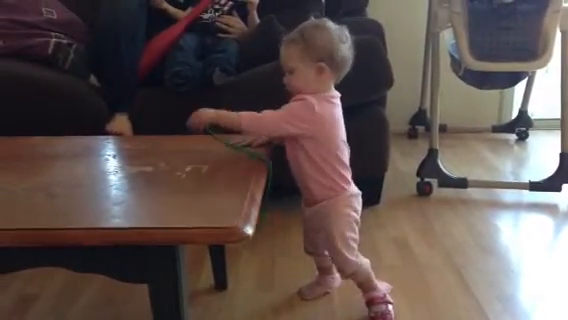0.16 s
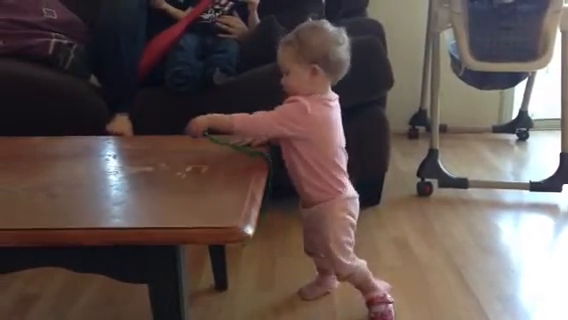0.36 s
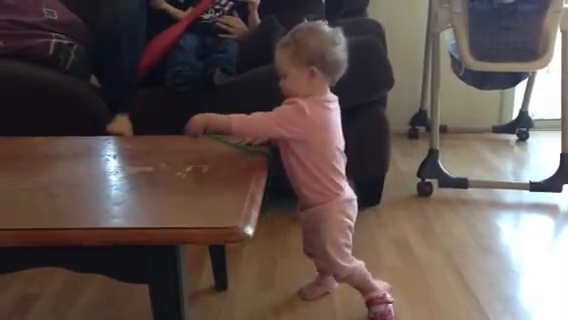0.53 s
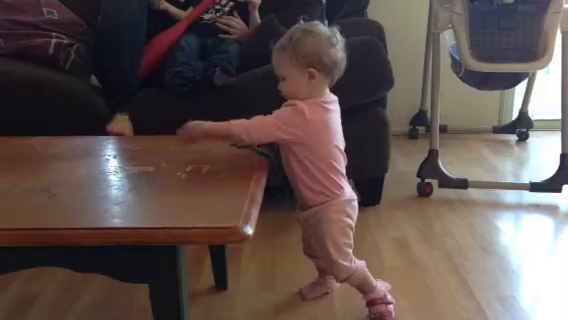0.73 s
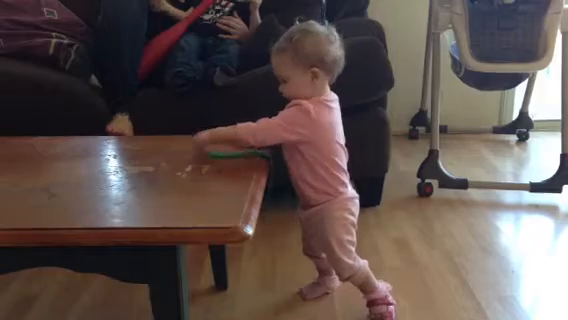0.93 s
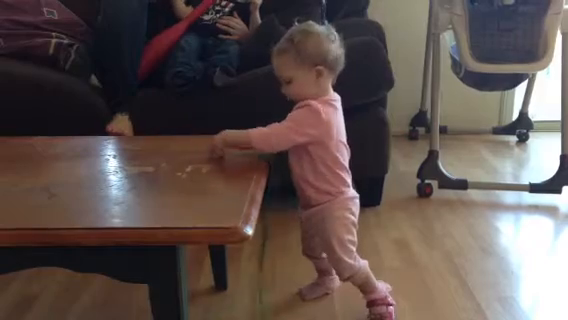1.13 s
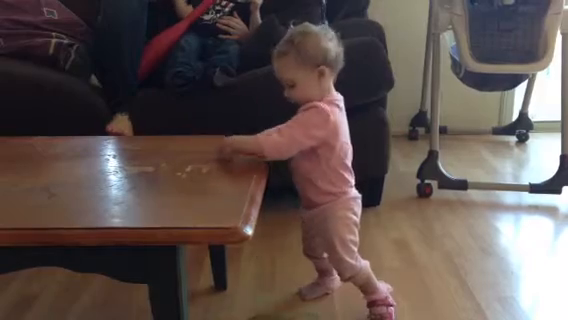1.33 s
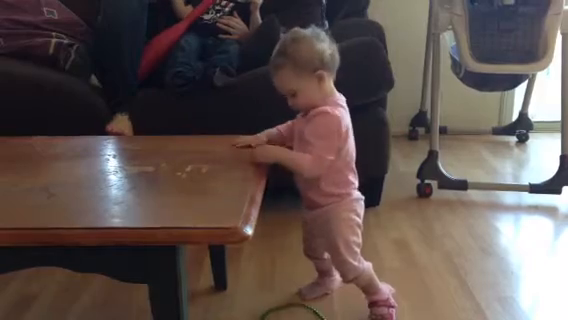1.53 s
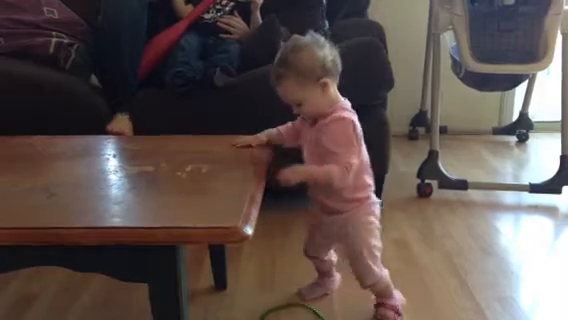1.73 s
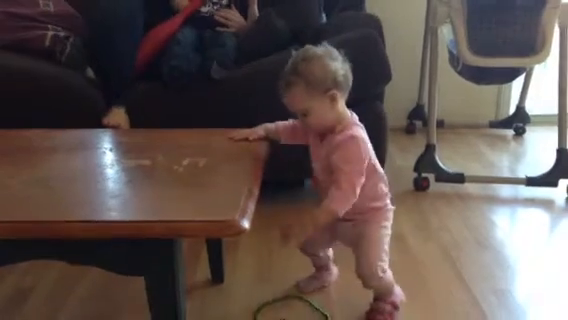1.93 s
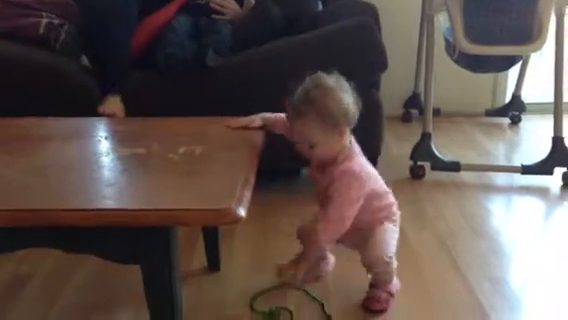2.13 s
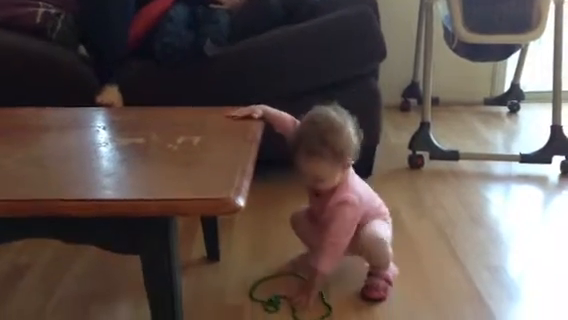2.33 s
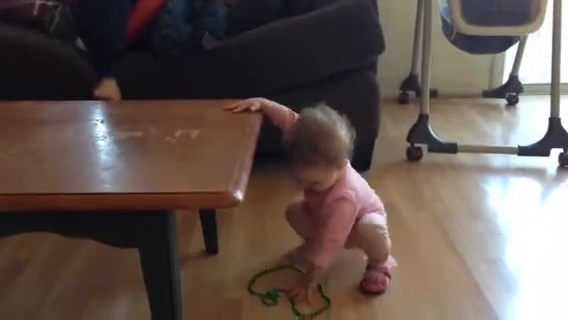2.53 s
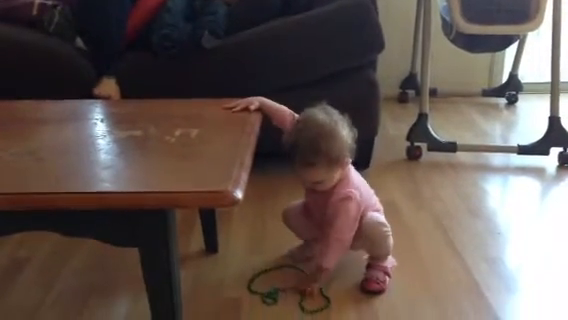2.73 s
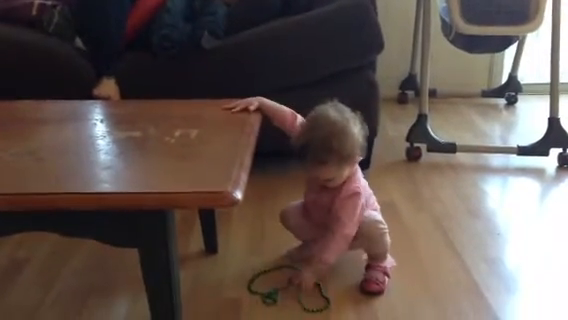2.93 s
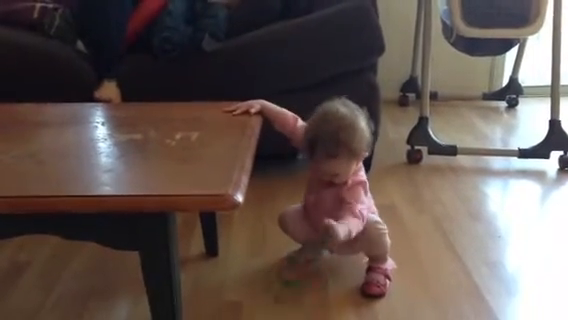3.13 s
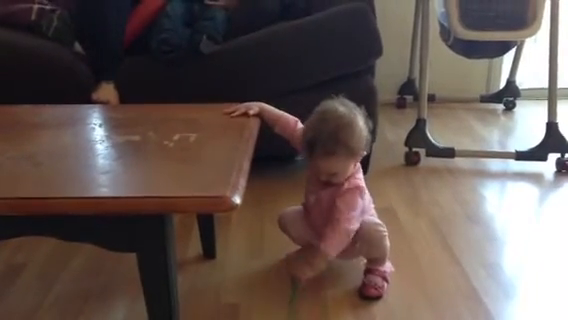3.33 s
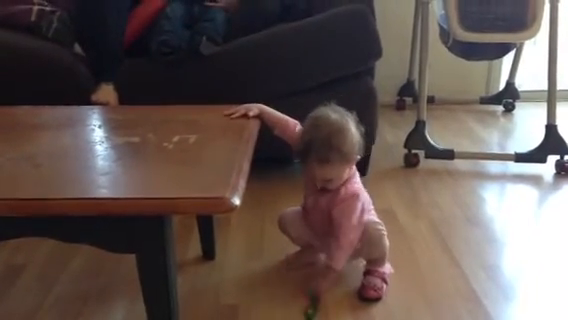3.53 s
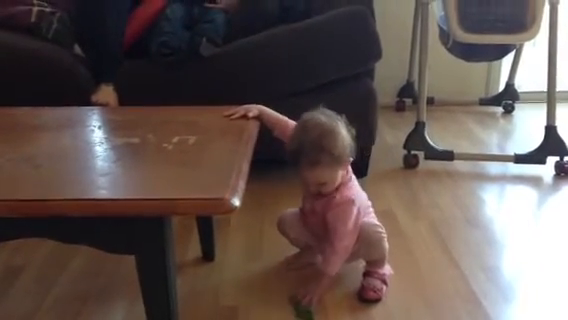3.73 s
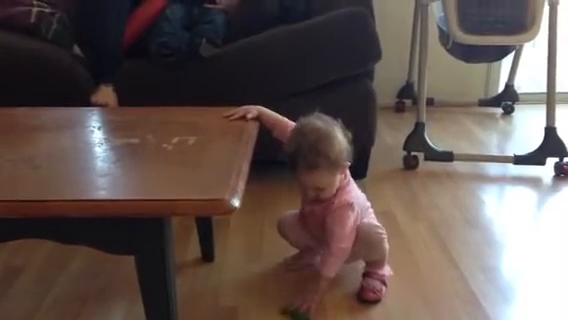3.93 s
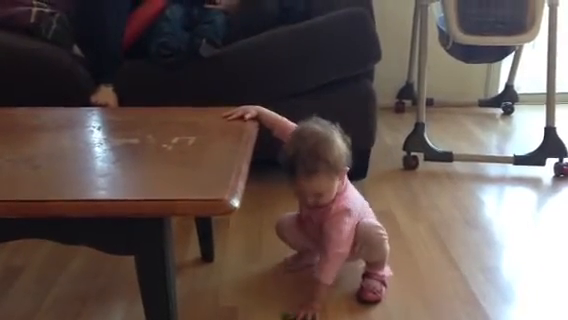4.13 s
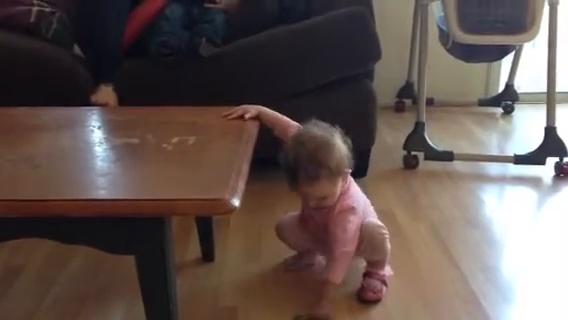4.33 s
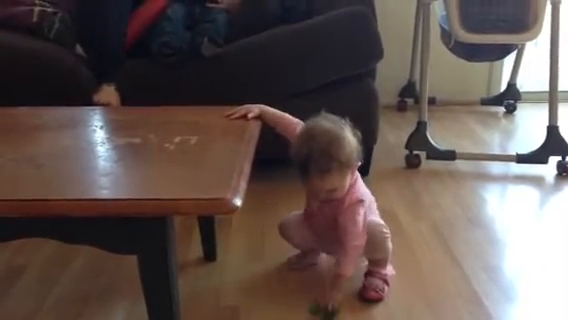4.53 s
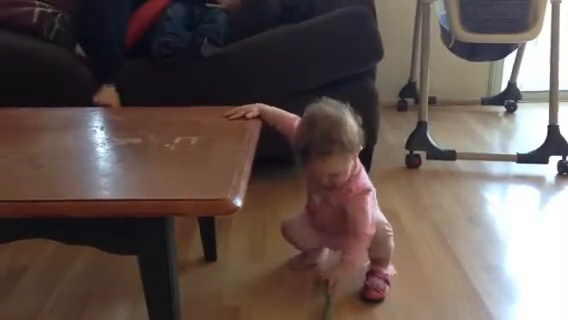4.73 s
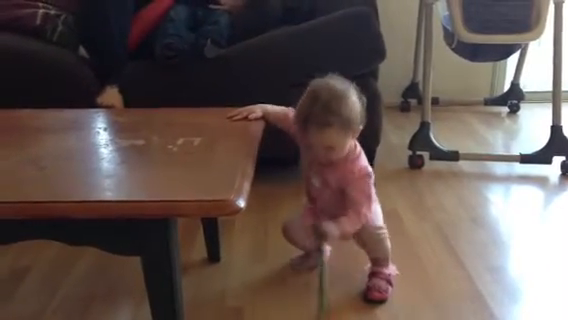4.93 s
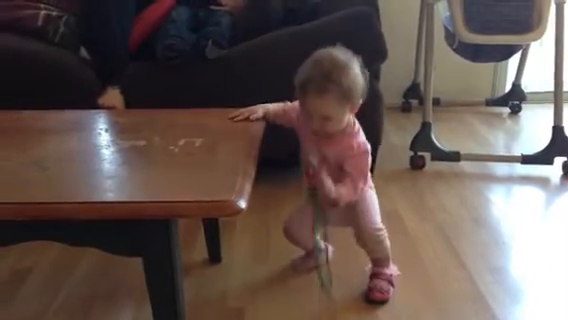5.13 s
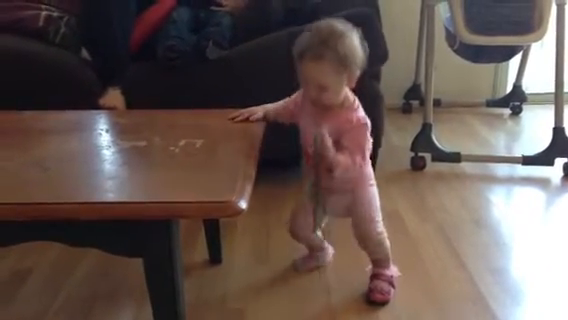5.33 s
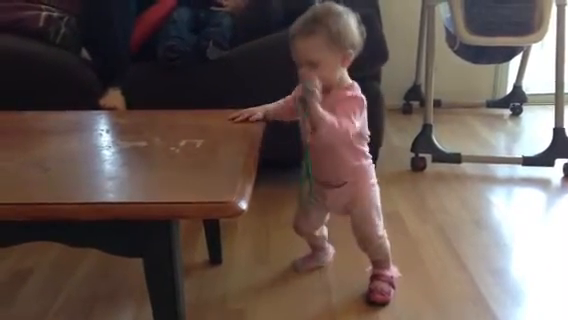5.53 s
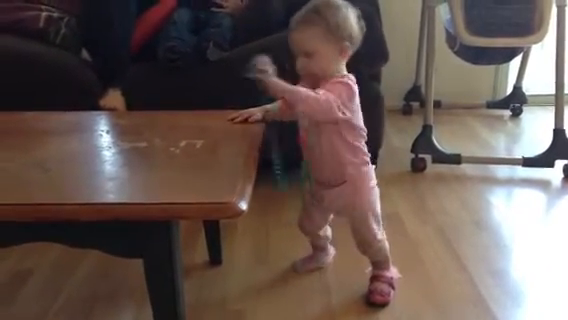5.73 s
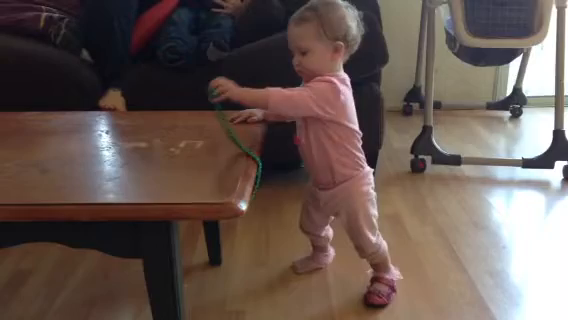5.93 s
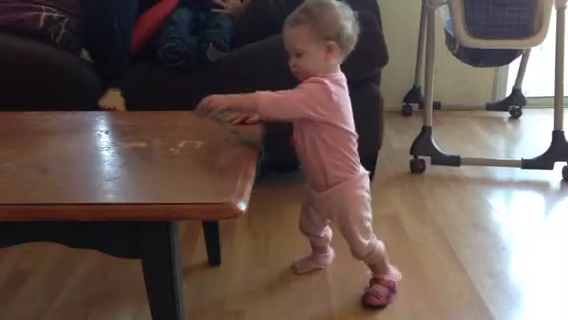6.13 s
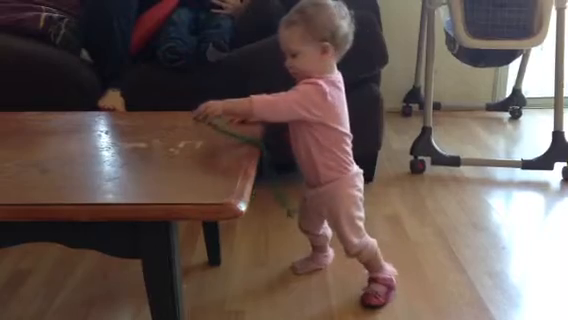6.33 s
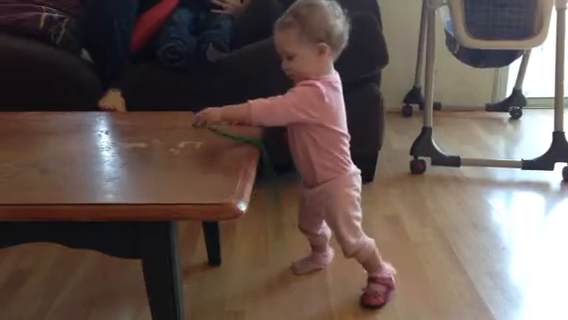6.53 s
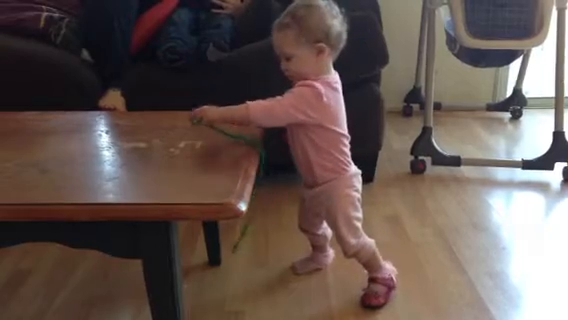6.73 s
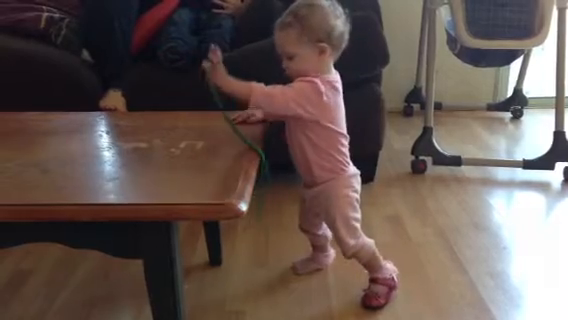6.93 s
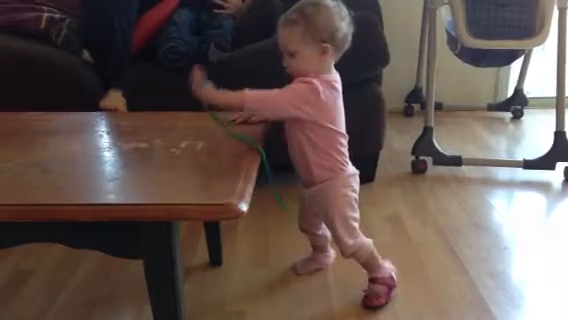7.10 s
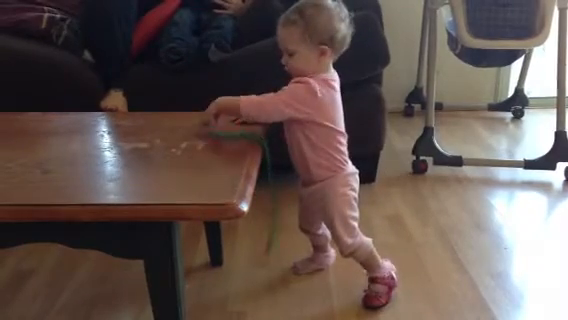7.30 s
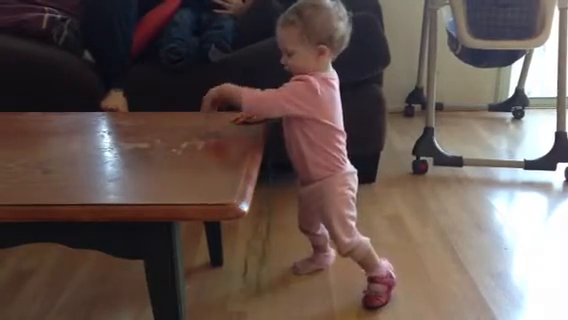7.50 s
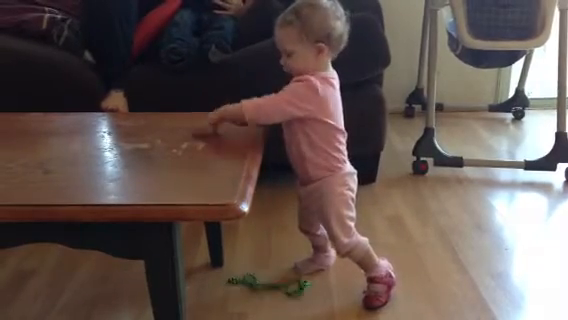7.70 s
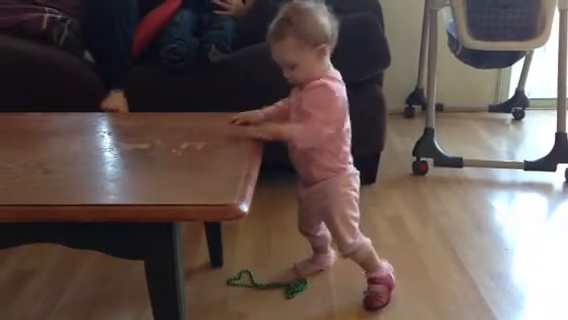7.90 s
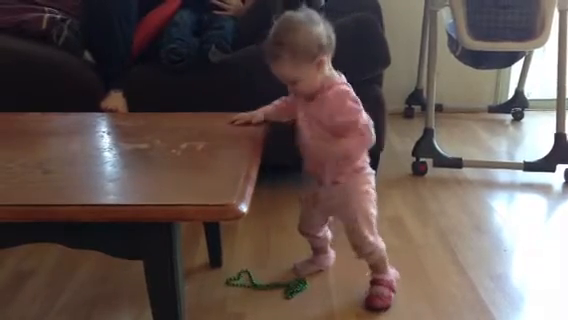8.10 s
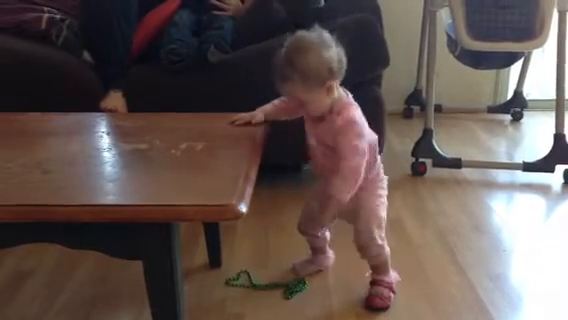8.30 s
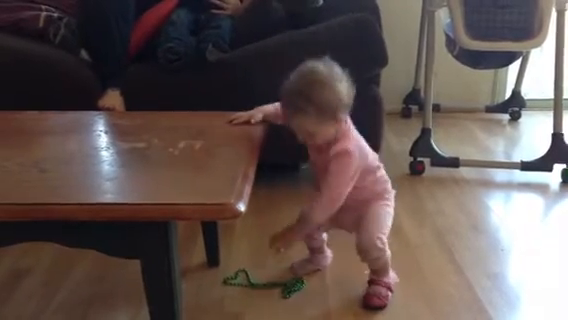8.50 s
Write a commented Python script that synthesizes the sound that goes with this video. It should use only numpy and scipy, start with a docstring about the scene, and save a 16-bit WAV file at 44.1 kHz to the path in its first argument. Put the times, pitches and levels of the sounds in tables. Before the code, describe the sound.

A string of light plastic beads drags softly over a wooden table, then slides off and hits a hardwood floor in a quick bright clatter. Fingers stir it with small ticks, a smaller drop follows, then a quiet pause. The beads slap back on the table, drag, and fall loudly again. Fairly close small microphone, living room with short reflections, faint ventilation and hum.

```python
"""Plastic beads on a string clatter on a hardwood floor: each contact excites a short minimum-phase pulse.
A toddler drags the necklace over a wooden table until it slides off; she gathers it, drops it,
lifts it back onto the table, and it slides off again. Decaying modes carry the sound of the table top.
Reflections and a diffuse tail of under half a second follow each click.
Filtered noise and three wavering sines form the ventilation and the appliance hum behind it all."""
import sys
import numpy as np
from scipy import signal
from scipy.fft import rfft, irfft, next_fast_len
from scipy.io import wavfile
from scipy.ndimage import uniform_filter1d

SR = 44100
rng = np.random.default_rng(int(sys.argv[2]) if len(sys.argv) > 2 else 0)


def unload_audio(sound):
    """Save the sound as a 16-bit wav file, at the path given as the first command line argument."""
    columns = np.transpose(np.atleast_2d(sound))
    # keep every value between -1 and 1, then stretch to whole-number steps
    steps = np.round(np.clip(columns, -1, 1) * 32767)
    wavfile.write(sys.argv[1], SR, steps.astype(np.int16))


N = 377348

# Single beads that click out clearly, on the floor or against each other.
# Each row: start in seconds, peak level in dB before gain, share of bead on bead in dB.
SINGLE_BEADS = [(1.4478, -13.5, -9), (1.4709, -14, -9), (1.5867, -25.5, -9), (1.5942, -25.5, -14),
                (2.817, -36, -7), (2.8972, -38.5, -9), (2.9859, -38, -9), (3.0105, -21.5, -3.5),
                (3.0461, -23, -3), (3.0826, -24, 2), (3.0935, -19.5, -2), (3.1235, -20.5, -12),
                (3.1363, -21, -12), (3.1848, -26.5, -1), (3.2108, -25.5, -9), (3.3217, -17.5, -13),
                (3.3535, -13, 4), (3.3803, -9, 1), (3.4953, -12.5, -6), (3.6655, -20, -6),
                (3.7266, -23.5, -19), (3.7745, -30, -3), (3.82, -18.5, -5.5), (3.8293, -28, -11),
                (3.8735, -27, -3), (3.9536, -34, 0), (4.3459, -25.5, -1), (4.4583, -31, -1),
                (4.5372, -26.5, -5), (4.6105, -29, 1), (4.7858, -34.5, -1), (4.8247, -35, -3),
                (4.9245, -32.5, 2), (5.0687, -25.5, -6), (5.1654, -32.5, 0), (6.962, -38.5, 11),
                (7.795, -14.5, -8)]
# Strokes of the fingers stirring the beads on the floor.
# Each row: start in seconds, length in seconds, level in dB before gain, change over the stroke in dB.
FINGER_STIRS = [(2.412, .07, -57, -11.5), (2.65, 0.28, -61.5, -2), (3.01, 0.07, -53, 1),
                (3.07, 0.1195, -44.5, -4.5), (3.43, 0.38, -34.5, -23.5), (3.83, 0.32, -53.5, -15),
                (4.178, .15, -54.5, -3.5), (4.33, 0.062, -51, 6.5), (4.39, 0.27, -45, -12),
                (4.66, 0.14, -64, -4), (4.782, 0.29, -57.5, 1), (5.068, 0.096, -51.5, -8)]


def floor(stir_gain_db=-2, stir_clink_db=-10):
    """Superposition: strikes, dense small contacts, board knocks and clinks add up on the floor."""
    falls = [pouring(fall) for fall in NECKLACE_FALLS]
    stirring = strokes(FINGER_STIRS, attack_s=0.0042, release_s=0.006)
    pour = sum(falls) * contacts(per_s=600, spread_db=4.0)
    stir = amp(stir_gain_db) * stirring * contacts(per_s=260, spread_db=1.5)
    knocks = floorboards(pour, stir)
    # the more tangled the string, the more its beads hit each other
    tangle = sum(amp(fall[-1]) * gain for fall, gain in zip(NECKLACE_FALLS, falls))
    tangle = tangle + amp(stir_clink_db) * stirring
    clinks = ring(tangle * contacts(per_s=680, spread_db=6.0), click(CLINK_COLOUR))
    strikes = ticks(SINGLE_BEADS + landings())
    poured = beads(pour, pitch_spread=0.22)
    stirred = beads(stir, pitch_spread=0.21, shift=0.96)
    return strikes + poured + stirred + knocks + clinks


# The necklace falls: its end touches down, a run of beads follows, the rest lands in a heap,
# bounces and settles. Each row: touch in seconds, heap in seconds, heap length in seconds,
# run peak level, heap peak level and settling level in dB before gain, settling length in seconds,
# share of bead on bead in dB.
NECKLACE_FALLS = [(1.2463, 1.3466, 0.032, -13.5, -1.5, -38, 0.17, -6.5),
                  (3.317, 3.402, 0.019, -23.5, -9, -36.5, 0.1, -0.5),
                  (7.6, 7.6975, 0.022, -9, -1, -42, 0.14, -9)]


def landings(run_gap_s=.0068, heap_gap_s=.0042, lead_db=10.5, lead_s=0.011, growth_db=7.5, fade_db=-12):
    """Sequential impact: the leading end hits hard, the run grows as the string speeds up, the heap fades."""
    rows = []
    for touch, heap, heap_length, run_db, heap_db, _, _, tangle_db in NECKLACE_FALLS:
        run_length = heap - touch
        for t, scatter in succession(run_length, run_gap_s):
            lead = lead_db * np.exp(-(t / lead_s) ** 2)
            growth = growth_db * (t / run_length - 1)
            rows.append((touch + t, run_db + lead + growth + scatter, tangle_db))
        for t, scatter in succession(heap_length, heap_gap_s):
            fade = fade_db * t / heap_length
            rows.append((heap + t, heap_db + fade + scatter, tangle_db))
    return rows


def succession(length, gap_s, uneven=.6, scatter_db=2.2, count=32):
    """Quasi-periodicity: beads on a string land almost evenly; gives delays (s) and force scatter (dB)."""
    slip = rng.uniform(-.5, .5, count)  # in shares of a gap, before uneven
    scatter = rng.standard_normal(count)
    delay = gap_s * (np.arange(count) + uneven * slip)
    delay[0] = scatter[0] = 0
    return zip(delay[delay < length], scatter_db * scatter)


def pouring(fall, run_share_db=-24, heap_share_db=-23, swell_db=4, bounce_s=0.092, settle_fade_db=-16.5):
    """Envelope shaping of the small contacts in a fall: run, heap, then settling after one bounce."""
    touch, heap, heap_length, run_db, heap_db, settle_db, settle_length, _ = fall
    stages = [(touch, heap - touch, run_db + run_share_db, swell_db),
              (heap, heap_length, heap_db + heap_share_db, 0),
              (heap + bounce_s, settle_length, settle_db, settle_fade_db)]
    return strokes(stages, attack_s=0.0027, release_s=0.0065)


# Colour of a bead struck by another bead. Each row: frequency in Hz, relative level in dB.
CLINK_COLOUR = [(300, -25.5), (2000, -10), (4000, 1), (6600, -7.5), (8500, -9), (11000, -10.5),
                (15000, -16)]


def ticks(strikes, gain_db=-2.0, pitch_spread=0.037, rebound_db=-3, rebound_s=.0016,
          jostle_db=-2, jostle_s=.007, growth=.2, count=3, most=256):
    """Impact and rebound: each hard strike bounces once, then knocks neighbouring beads together."""
    out, clink = np.zeros(N), click(CLINK_COLOUR, size=512)
    chances = rng.random((most, count + 2))
    for (s, db, tangle_db), (pitch, hop, *waits) in zip(strikes, chances):
        pulse = click(BEAD_COLOUR, np.exp((2 * pitch - 1) * pitch_spread), size=512)
        force = amp(db + gain_db) / abs(signal.hilbert(pulse)).max()
        add(out, s, force * pulse)
        # soft strikes stay clean, hard ones shake the string
        shake = force * amp(growth * db)
        add(out, s + (.5 + hop) * rebound_s, shake * amp(rebound_db) * pulse)
        for wait in waits:
            add(out, s + wait * jostle_s, shake * amp(jostle_db + tangle_db) * clink)
    return out


# Colour of a bead on the floor. Each row: frequency in Hz, relative level in dB.
BEAD_COLOUR = [(100, -47.5), (400, -24.5), (1000, -23), (2000, -19), (3000, -11.5), (3800, -1.5),
               (5200, -0.5), (6400, -4.5), (7800, -12), (10000, -24.5), (15000, -29.5)]


def beads(train, pitch_spread, shift=1, count=5):
    """Contact time sets pitch: every contact lasts a little longer or shorter, so clicks differ in pitch."""
    which = rng.integers(0, count, N)
    out = np.zeros(N)
    for k, offset in enumerate(np.linspace(-1, 1, count)):
        pulse = click(BEAD_COLOUR, shift * np.exp(offset * pitch_spread))
        out += ring(train * (which == k), pulse)
    return out


# Bunched beads landing on the boards. Each row: start in seconds, level in dB before gain.
HEAP_THUDS = [(1.347, -41.5), (1.36, -32.5), (3.353, -42), (3.38, -44), (3.402, -56), (7.603, -46.5),
              (7.622, -57.5), (7.7, -47), (7.715, -38.5)]
# Colour of the floorboards. Each row: frequency in Hz, relative level in dB.
BOARD_COLOUR = [(60, -33), (120, -26), (190, -15.5), (350, 4.5), (450, 3), (620, 0), (900, -4.5),
                (1500, -7), (2500, -10), (5000, -23.5), (12000, -36)]


def floorboards(pour, stir, thud_gain_db=-1, pour_db=-15, rub_db=-12):
    """Forced panel vibration: small contacts drive the boards, and a landing heap makes them knock."""
    drive = amp(pour_db) * pour + amp(rub_db) * stir
    knocks = ring(drive, wood(BOARD_COLOUR, t60=0.012))
    for s, db in HEAP_THUDS:
        knock = wood(BOARD_COLOUR, t60=0.099)
        onset_rms = knock[:SR // 100].std()
        add(knocks, s, amp(db + thud_gain_db) * knock / onset_rms)
    return knocks


# Pulls of the string over the table.
# Each row: start in seconds, length in seconds, level in dB before gain, change over the pull in dB.
STRING_DRAGS = [(0, 0.28, -59, -12), (.15, 0.35, -47, -15), (.6, 0.49, -66, 21), (1.05, 0.12, -44.5, -3.5),
                (5.89, 0.061, -40.5, -10.5), (6.017, 0.15, -45.5, 1), (6.15, 0.072, -38.5, -7),
                (6.236, 0.12, -36, -11), (6.54, 0.021, -56.5, -6), (6.733, 0.14, -56, 4.5),
                (6.885, .05, -43.5, -5.5), (7.12, 0.047, -55.5, 9), (7.168, 0.13, -44, -4),
                (7.28, 0.21, -42, 4.5)]
# Runs of beads slapping down on the table.
# Each row: start in seconds, level in dB before gain, length in seconds,
# clatter of bead on bead in dB before gain.
TABLE_SLAPS = [(0.146, -49.5, 0.015, -14), (.208, -44, 0.0046, -14), (0.246, -47.5, 0.011, -14),
               (0.429, -50, 0.016, 4), (0.876, -52, 0.0067, 9), (1.056, -44, 0.011, -16),
               (5.879, -35.5, 0.011, 4.5), (5.895, -40.5, 0.021, -16), (6.015, -46.5, 0.0177, -16),
               (6.147, -29, 0.013, 7), (6.233, -36, 0.015, 13), (6.882, -33.5, 0.0076, -20),
               (7.109, -48.5, 0.019, -11), (7.278, -38.5, 0.0078, 6), (7.407, -53, 0.0071, -20),
               (7.455, -36.5, 0.01, -16)]


def table(drag_gain_db=-2.0, slap_gain_db=-1, drag_clatter_db=-19, slap_clatter_db=-12, count=9):
    """Source and resonator: beads bump over the edge and slap on the top, which rings under them."""
    pulls = strokes(STRING_DRAGS, attack_s=0.0034, release_s=.016)
    drive = amp(drag_gain_db) * contacts(per_s=1400, spread_db=3) * pulls
    clatter = amp(drag_clatter_db) * drive
    for s, db, length, clatter_db in TABLE_SLAPS:
        # cubed noise is spiky, like a burst of separate impacts
        run = rng.standard_normal(SR // 20)[:max(int(length * SR), 2)] ** 3
        run = amp(db + slap_gain_db) * run / run.std()
        add(drive, s, run)
        add(clatter, s, amp(clatter_db + slap_clatter_db) * run)
    spots = [top(modes_db=-1.5, contact_db=-3.0, t60=0.022) for _ in range(count)]
    return roam(drive, spots, cycle_s=.07) + ring(clatter, click(CLINK_COLOUR))


# Colour of the table top. Each row: frequency in Hz, relative level in dB.
TABLE_COLOUR = [(100, -29), (400, -13.5), (750, -10.5), (1100, -7.5), (1500, 1.5), (1950, -1.5), (2400, 2),
                (3200, 1.5), (4500, -3.5), (6500, -10), (9000, -16), (15000, -36)]
# Ringing of the table top. Each row: frequency in Hz, relative level in dB, 60 dB decay time in seconds.
TABLE_RINGING = [(930, -6, 0.061), (1202, -4, 0.092), (1498, 3.5, 0.077), (1601, -2.5, .06), (1747, 0, .07),
                 (2260, -5, .04), (2400, -7, 0.03985), (2694, 0, 0.048), (3010, 3.5, .045),
                 (3680, -0.5, .04), (4070, -7, .035)]


def top(modes_db, contact_db, t60):
    """Modal synthesis: the spot struck on the table decides how strongly each mode rings."""
    t = np.arange(SR // 8) / SR
    modes = np.zeros(len(t))
    for hz, db, decay in TABLE_RINGING:
        strength = rng.uniform(0.31, 1)
        sine = np.sin(2 * np.pi * (hz * t + rng.random()))
        modes += amp(db - 60 * t / decay) * strength * sine
    sound = wood(TABLE_COLOUR, t60) + amp(modes_db) * unit(modes)
    add(sound, 0, amp(contact_db) * click(TABLE_COLOUR))
    return unit(sound)


def contacts(per_s, spread_db, size=2200):
    """Random-impulse process: bead contacts of uneven force, held to a local mean power near 1."""
    train = np.zeros(N)
    at = np.flatnonzero(rng.random(N) < per_s / SR)
    excess = np.minimum(rng.exponential(1, N)[at], 3)
    train[at] = amp(spread_db * excess) * rng.choice([-1, 1], N)[at]
    return train / np.sqrt(abs(uniform_filter1d(train ** 2, size)) + 1 / size)


def strokes(rows, attack_s, release_s):
    """Amplitude envelope: each stroke sets in, swells or fades evenly in dB, and dies away."""
    gain = np.zeros(N)
    t = np.arange(SR) / SR
    for start, length, db, change_db in rows:
        gate = np.minimum(t / attack_s, 1) * np.exp(-np.maximum(t - length, 0) / release_s)
        add(gain, start, gate * amp(db + change_db * np.minimum(t / length, 1)))
    return gain


def click(spectrum, shift=1, size=2048):
    """Minimum phase: the most compact causal pulse with this spectrum, moved in pitch by the factor shift."""
    hz = abs(np.fft.fftfreq(size, 1 / SR)) / shift
    log_gain = np.log(amp(read(spectrum, hz)))
    # the Hilbert transform of the log gain gives the phase
    response = np.exp(np.conj(signal.hilbert(log_gain)))
    return unit(np.fft.ifft(response).real[:size // 2])


def wood(spectrum, t60):
    """High modal density: decaying noise stands for many close, quickly dying modes of a wooden panel."""
    t = np.arange(SR // 8) / SR
    burst = rng.standard_normal(len(t)) * amp(-60 * t / t60)
    return unit(signal.fftconvolve(burst, click(spectrum))[:len(t)])


def ring(x, response):
    """Convolution: every impulse in the drive sets off the whole response."""
    return signal.oaconvolve(x, response)[:N]


def roam(x, responses, cycle_s):
    """Equal-power crossfade: the beads keep moving, so each response hands over smoothly to the next."""
    count = len(responses)
    place = np.arange(0, count, count / (cycle_s * SR))
    out = np.zeros(N)
    for k, response in enumerate(responses):
        distance = np.minimum(abs((place - k + 1) % count - 1), 1)
        share = np.cos(np.pi / 2 * distance)
        out += ring(x * np.resize(share, N), response)
    return out


def amp(db):
    """Decibel law: the amplitude ratio of a level."""
    return 10 ** (np.asarray(db) / 20)


def unit(x):
    """Energy normalisation: scales to an energy of 1."""
    return x / np.sqrt(np.sum(x ** 2) + 1e-20)


def read(points, hz):
    """Logarithmic interpolation: reads a curve on a log-frequency axis."""
    f, value = np.transpose(points)
    return np.interp(np.log(hz + 1), np.log(f + 1), value)


def add(mix, s, sound):
    """Superposition in place: adds a sound to the mix from s seconds on."""
    part = mix[max(round(s * SR), 0):][:len(sound)]
    part += sound[:len(part)]


def room(x, wet_db, early_db, count=5):
    """Direct and reflected sound: the echoes come from wherever the beads are."""
    return x + roam(x, [echoes(wet_db, early_db) for _ in range(count)], cycle_s=.05)


# Decay of the living room. Each row: frequency in Hz, 60 dB decay time in seconds.
ROOM_DECAY = [(200, 0.18), (700, 0.3), (2000, 0.43), (4500, 0.33), (8000, 0.3135), (14000, 0.4)]


def echoes(wet_db, early_db, build_s=0.0031, count=8):
    """Reverberation: early reflections off nearby furniture and a diffuse tail that decays by frequency."""
    hz, t, noise = signal.stft(rng.standard_normal(SR // 2), SR, nperseg=256)
    decay = amp(-60 * t / read(ROOM_DECAY, hz)[:, None])
    build = 1 - np.exp(-t / build_s)
    tail = signal.istft(noise * decay * build, SR, nperseg=256)[1]
    early = np.zeros(len(tail))
    # 2.5 to 20 ms after the direct sound
    early[rng.integers(SR // 400, SR // 50, count)] = rng.choice([-1, 1], count)
    return amp(wet_db) * unit(tail) + amp(early_db) * unit(early)


# Colour of the ventilation noise. Each row: frequency in Hz, relative level in dB.
AIR_COLOUR = [(30, -23.5), (80, -9), (110, -14), (165, 5), (260, 2), (400, -2.5), (500, -4.5), (800, -9.5),
              (1300, -15.5), (2500, -16.5), (5000, -20.5), (10000, -24.5), (15500, -25)]
# Appliance hum. Each row: frequency in Hz, rms level in dB before the waver.
APPLIANCE_HUM = [(119.8, -68.5), (167, -75.5), (360.5, -63)]


def background(air_db=-58.5, waver=0.065):
    """Filtered noise and amplitude modulation: soft ventilation noise and a slightly wavering hum."""
    size = next_fast_len(N)
    gain = amp(read(AIR_COLOUR, np.fft.rfftfreq(size, 1 / SR)))
    air = irfft(rfft(rng.standard_normal(size)) * gain, size)[:N]
    t = np.arange(N) / SR
    knots = np.linspace(0, t[-1], num=40)
    hum = np.zeros(N)
    for hz, db in APPLIANCE_HUM:
        sine = np.sqrt(2) * np.sin(2 * np.pi * (hz * t + rng.random()))
        drift = 1 + waver * np.interp(t, knots, rng.standard_normal(len(knots)))
        hum += amp(db) * sine * drift
    return amp(air_db) * air / air.std() + hum


def scene():
    """Superposition: floor and table sound in the room, over the background."""
    necklace = floor() + table()
    return (room(necklace, wet_db=-3.5, early_db=-9.5) + background())[None]


def record(dry, low_cut_hz=110, edge_hz=15600):
    """Band limiting: a small microphone with no deep bass, then a steep upper edge."""
    low_cut = signal.butter(3, low_cut_hz, "high", fs=SR, output="sos")
    thin = signal.sosfilt(low_cut, dry)
    band_limit = signal.firwin(511, edge_hz, window=("kaiser", 9), fs=SR)
    return signal.oaconvolve(thin, band_limit[None], "same")


dry = scene()
out = record(dry)
unload_audio(out)
```